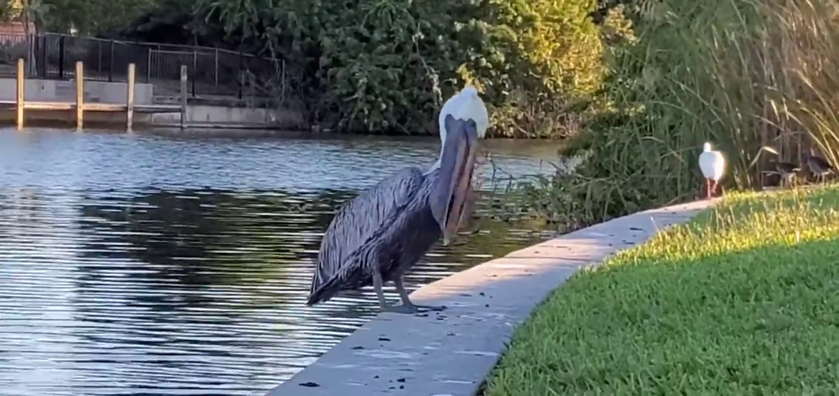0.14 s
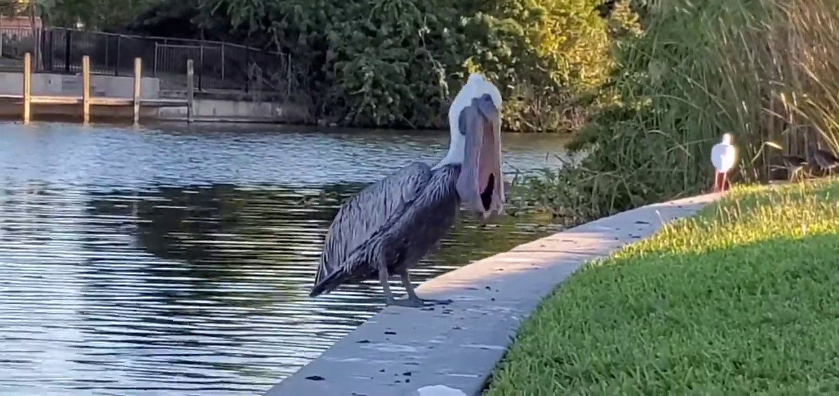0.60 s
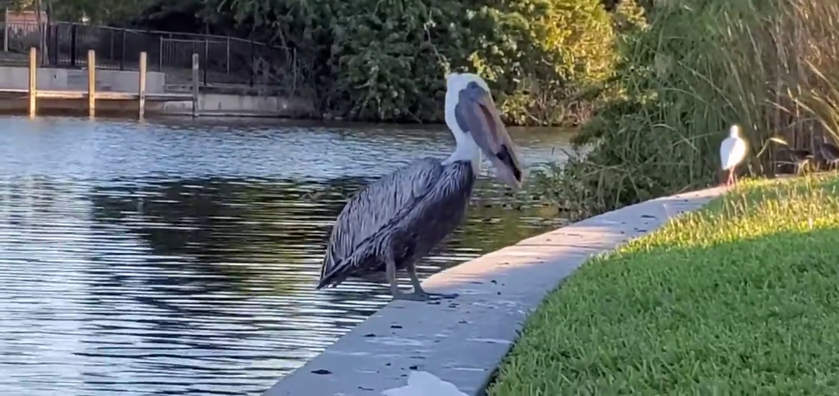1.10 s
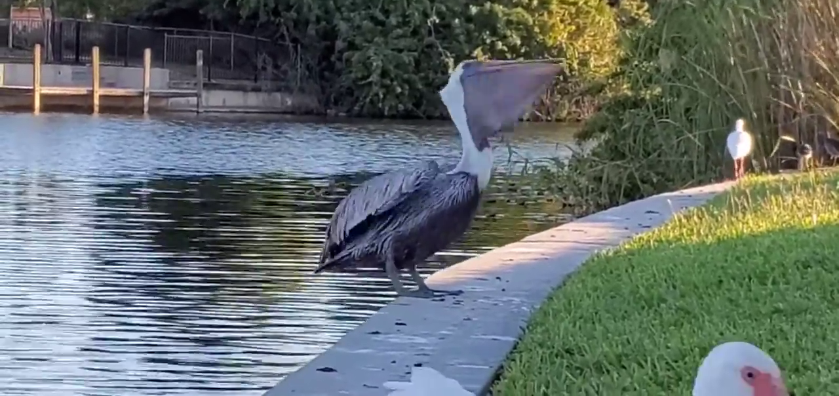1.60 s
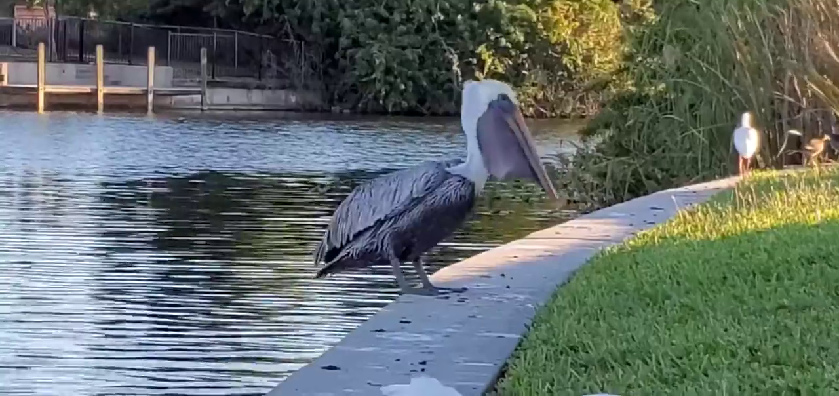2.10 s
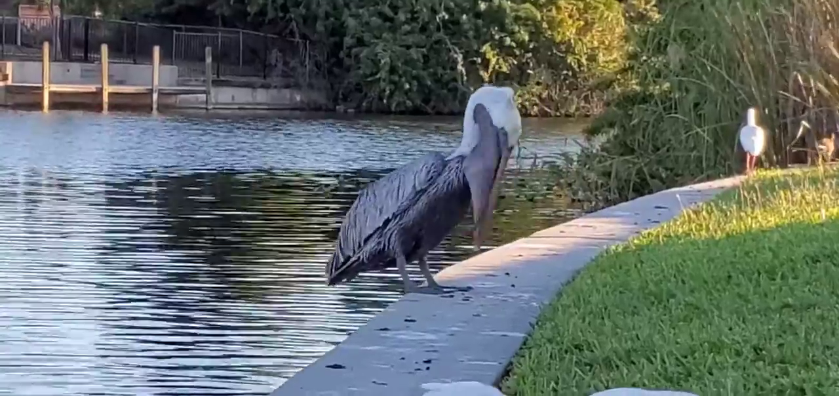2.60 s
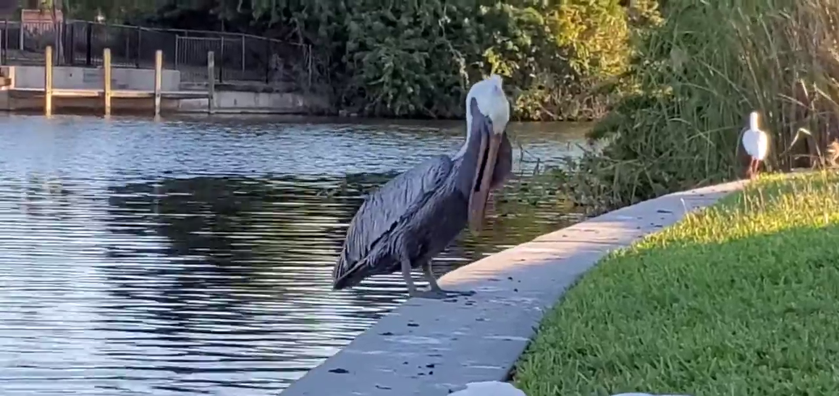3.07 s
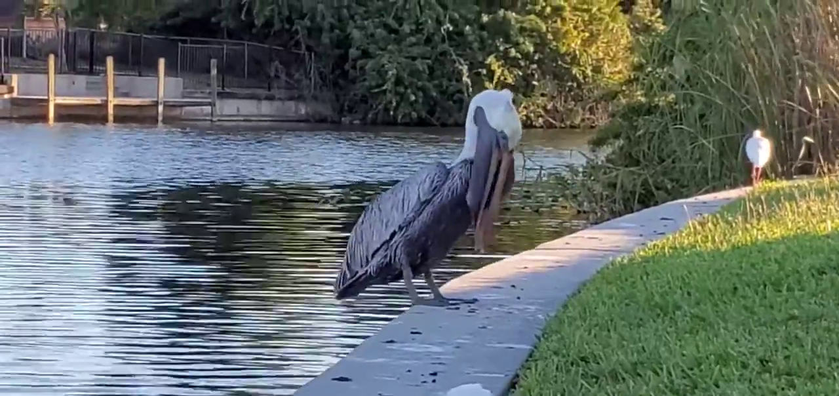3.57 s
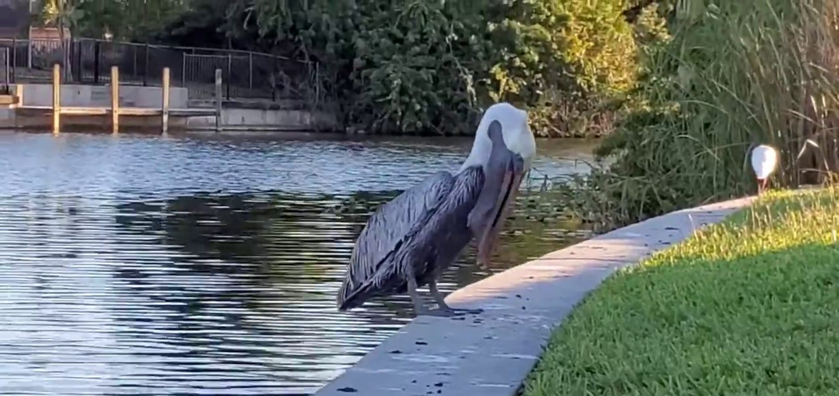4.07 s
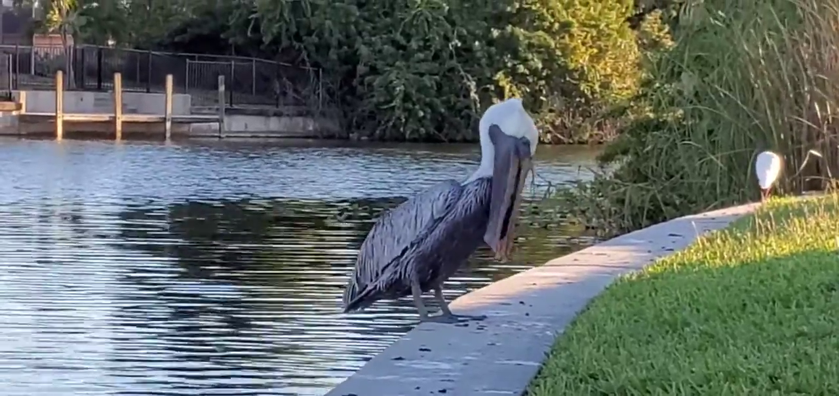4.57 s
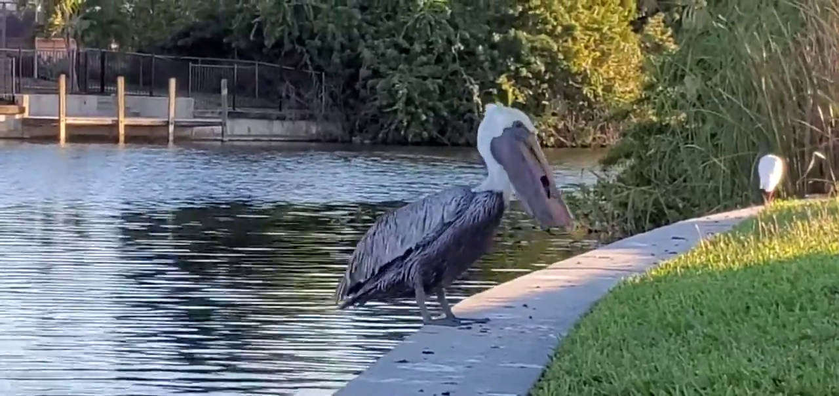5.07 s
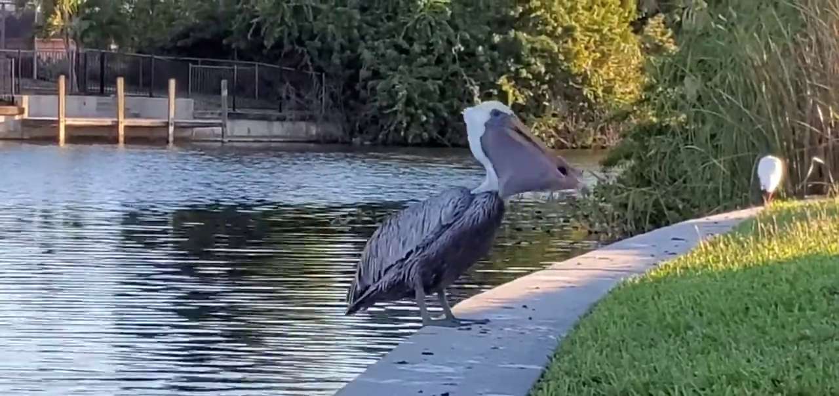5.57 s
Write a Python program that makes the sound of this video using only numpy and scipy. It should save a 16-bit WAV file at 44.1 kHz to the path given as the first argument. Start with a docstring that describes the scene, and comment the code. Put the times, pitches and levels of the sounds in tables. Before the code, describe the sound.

Outdoors by a pond, a steady low machine hum and town rumble lie under soft hiss. Grass rustles and ticks close to the stereo microphones. A water bird croaks into a rising nasal yelp with a squeal at about one second; a falling whistle breaks into a rasp after two, then a hollow thing is tapped and bounces. Later come a faint cheep and two weaker yelps.

```python
"""A distant machine hums over the rumble of a town while grass rustles and ticks close to two spaced microphones.
Beside a pond, water birds call: rising nasal yelps that open with a croak, a squeal, a falling whistle with a
thin hissy onset that breaks into a rasp, and one faint far cheep; between them a hollow thing is tapped and bounces.
Calls are overtones and breath noise shaped by throats; hum and knocks are built on sines; the rest is shaped noise."""
import sys
import numpy as np
from scipy import signal
from scipy.fft import rfft, irfft, next_fast_len
from scipy.io import wavfile
from scipy.ndimage import uniform_filter1d, map_coordinates

SR = 44100
rng = np.random.default_rng(int(sys.argv[2]) if len(sys.argv) > 2 else 0)


def convert_level_to_amplitude(level_db):
    """Map a level in decibels to its linear amplitude factor."""
    exponent = np.asarray(level_db, float) / 20
    return 10 ** exponent


def persist_wave(psi):
    """Save psi, clipped to +-1, as 16-bit WAV."""
    counts = np.round(np.clip(psi, -1, 1) * 32767).astype(np.int16)
    wavfile.write(sys.argv[1], SR, np.atleast_2d(counts).T)


N = 250488  # length in samples
ONSET_DB = -17  # where a croak or thin note starts, relative to its full level


def unit(x):
    """Scaled to rms 1."""
    return x / np.sqrt(np.mean(x ** 2) + 1e-20)


def along(points, hz):
    """Each column after the Hz, read on a log axis."""
    f, *cols = np.transpose(points)
    return np.squeeze([np.interp(np.log(hz + 1), np.log(f + 1), c) for c in cols])


def curves(rows, t):
    """Each column after the time, read at times t."""
    s, *cols = np.transpose(rows)
    return [np.interp(t, s, c) for c in cols]


def wobble(rate, size=N):
    """A smooth random curve, rate knots a second."""
    knots = rng.standard_normal(int(size * rate / SR) + 4)
    return map_coordinates(knots, [np.arange(size) * rate / SR])


def filtered(x, response):
    """x times a complex response of frequency."""
    m = next_fast_len(x.shape[-1] + 8192)
    spectrum = rfft(x, m) * response(np.fft.rfftfreq(m, 1 / SR))
    return irfft(spectrum, m)[..., :x.shape[-1]]


def sides(lean_db, lead=0):
    """Left and right gains for a level gap in dB and a phase lead of the left in radians."""
    half = convert_level_to_amplitude(lean_db / 2) * np.exp(.5j * lead)
    return np.array([half, 1 / half])


def rush(spectrum, patchy_db):
    """Stereo noise of rms 1 with patches of random gain; its likeness at the two microphones varies with pitch."""
    # Each row: frequency in Hz, left-right likeness 0-1.
    alike = [(30, 0.15), (60, 0.59), (150, 1), (400, 0.66), (800, 0.47), (1500, 0.1), (3000, 0.013)]
    # Each row: frequency in Hz, left over right in dB.
    lean = [(60, -0.5), (180, -1), (550, -0.5), (1650, -1), (4970, 0), (15000, -4.5)]
    z = signal.stft(rng.standard_normal((2, N)), nperseg=512)[2]
    field = uniform_filter1d(rng.standard_normal(z.shape[1:]), size=6, axis=0)
    field = uniform_filter1d(field, size=8, axis=1)
    pair = signal.istft(z * convert_level_to_amplitude(patchy_db * unit(field)), nperseg=512)[1][:, :N]

    def mid_and_side(hz):
        turn = np.arccos(np.clip(along(alike, hz), -1, 1)) / 2
        return convert_level_to_amplitude(along(spectrum, hz)) * [np.cos(turn), np.sin(turn)]

    mid, side = filtered(pair, mid_and_side)
    stereo = np.array([mid + side, mid - side])
    return unit(filtered(stereo, lambda hz: sides(along(lean, hz))))


def hum():
    """Machine tones drift in phase and strength over the distance, a little differently at each microphone."""
    # Steady tones of the machine. Each row: frequency in Hz, level in dB, random drift in knots per second.
    tones = [(59.94, -41.5, 4.005), (122.4, -55, 7.2), (465.6, -79, 3.1), (748, -78, 4.04)]
    # One tone swells now and then. Each row: time of the crest in seconds, level in dB.
    swells = [(.4, -65), (1.42, -65.5), (3.75, -61), (5.68, -61)]
    base_db, swell_s = -68.5, 0.3
    t = np.arange(N) / SR

    def tone(hz, rate):
        shared = 0.81 * wobble(rate)
        apart = 0.33 * np.outer([1, -1], wobble(rate))
        return np.sqrt(2) * np.sin(2 * np.pi * hz * t + shared + apart)

    swell_db = base_db + sum((db - base_db) * np.exp(-((t - s) / swell_s) ** 2) for s, db in swells)
    whine = convert_level_to_amplitude(swell_db + 3.4 * wobble(7)) * tone(369.4, 3.056)
    steady = sum(convert_level_to_amplitude(db + 4.3 * wobble(rate)) * tone(hz, rate) for hz, db, rate in tones)
    return (whine + steady) * convert_level_to_amplitude([[-.7], [.7]])  # leans right


def surroundings():
    """The low rumble of a town and a soft broad wash with the steady hiss of the microphones at its top."""
    # Shape of the rumble. Each row: frequency in Hz, relative density in dB.
    rumble = [(12, -84), (20, -51), (27, -16), (29, -4), (41, -2.5), (59, 3), (71, -2.5), (86, 1),
              (108, -5), (200, -33.5), (260, -76), (440, -120)]
    # Shape of the wash and hiss. Each row: frequency in Hz, relative density in dB.
    wash = [(94, -23.5), (160, -1.5), (194, -6.5), (340, -11.5), (480, -14.5), (680, -13), (900, -19.5),
            (1250, -20), (2400, -26.5), (4800, -30.5), (6300, -31.5), (7330, -38), (10000, -36.5),
            (15800, -27.5)]
    return convert_level_to_amplitude(-39.5) * rush(rumble, patchy_db=1.5) + convert_level_to_amplitude(-53.5) * rush(wash, patchy_db=1.28)


def grass():
    """A bright rustle: a low bed plus swishes that start fast and fade, broken up by uneven grains."""
    # The bed follows the breeze. Each row: time in seconds, level in dB.
    bed = [(0, -60.5), (2.5, -58.5), (5.68, -71.5)]
    # Swishes through the grass. Each row: start in seconds, level in dB.
    swishes = [(0.01, -54), (.17, -56), (1.12, -49.5), (1.37, -49), (1.55, -49), (1.765, -45.5),
               (1.97, -52), (2.2, -48), (2.33, -56), (2.49, -54), (2.65, -49.5), (3.55, -51.5)]
    # Shape of the rustle. Each row: frequency in Hz, relative density in dB.
    blades = [(3000, -11), (6000, -9.5), (8000, -15), (10000, -11), (12500, -3), (14500, -11.5), (15800, 3)]
    rise_s, t60_s = 0.0057, 1
    t = np.arange(N) / SR
    power = convert_level_to_amplitude(curves(bed, t)[0]) ** 2
    for s, db in swishes:
        age = np.clip(t - s, 0, None)
        power += (convert_level_to_amplitude(db - 60 * age / t60_s) * (1 - np.exp(-age / rise_s))) ** 2
    grains = convert_level_to_amplitude(1.6 * wobble(30) + 2.4 * wobble(150))
    return np.sqrt(power) * grains * rush(blades, patchy_db=1.0)


def ticks():
    """Each snap is a sharp burst of noise through one resonance; many fainter ones fall at random."""
    # Dry ticks close by. Each row: start in seconds, level in dB, centre in Hz, breadth relative to the centre.
    close = [(.0199, -39, 13900, 0.19), (.8106, -46, 11900, 0.29), (.855, -47, 14000, .4),
             (.8935, -36, 4200, 0.53), (1.243, -44.5, 9300, 0.12), (1.381, -45, 10000, .5),
             (1.595, -49, 5000, 1.1), (1.696, -45.5, 2520, 0.2), (1.771, -51, 9300, 0.26),
             (1.928, -52, 7000, 0.33), (1.997, -45, 7000, 0.71), (2.781, -43.5, 12500, 0.45),
             (2.99, -53.5, 6000, 0.41), (3.052, -50, 8500, .9), (3.129, -42, 12000, 1),
             (3.5154, -47, 14000, .4), (3.6516, -52, 14500, .4), (3.773, -48, 11000, 1),
             (3.8262, -64, 4300, 0.35), (4.0547, -55, 14500, .3), (4.2183, -52, 14500, .3),
             (4.3535, -51, 11800, .5), (4.382, -49, 5700, 0.23), (4.9655, -35, 11000, 1.1),
             (5.3597, -48, 12100, 0.4)]
    out, t = np.zeros((2, N + SR)), np.arange(SR // 50) / SR
    when, strength, colour = rng.random((60, 3)).T
    faint = np.transpose([when * N / SR, -60 + 7 * strength, 4000 + 10000 * colour, 0.45 + strength])
    for s, db, hz, breadth in [*close, *faint]:
        noise = rng.standard_normal(len(t)) + .5 * rng.standard_normal((2, len(t)))  # shared + each side
        burst = convert_level_to_amplitude(-60 * t / 0.0073) * noise
        peak = signal.iirpeak(hz, 0.84 / max(breadth, .05), SR)
        snap = signal.lfilter(*peak, signal.lfilter(*peak, burst))  # twice, for steep flanks
        out[:, round(s * SR):][:, :len(t)] += convert_level_to_amplitude(db) * snap / np.abs(snap).max()
    return out[:, :N] * convert_level_to_amplitude([[-1.6], [1.6]])  # leans right


def voice(notes, throat, jitter, breath, tilt_db=0, shimmer_db=2.2, count=24):
    """Overtones of the pitch, lines halfway when every other beat is weak, and rasp, all through the throat."""
    source = np.zeros(N)
    for rows in notes:
        at = np.arange(round(rows[0][0] * SR), min(round(rows[-1][0] * SR), N))
        hz, db, half, rasp = curves(rows, at / SR)
        rasp = np.clip(rasp, 0, 1)
        shaken_hz = hz * (1 + jitter * rasp * wobble(316, size=len(at)))
        phase = np.pi * np.cumsum(shaken_hz) / SR  # runs at half the pitch
        k = np.arange(1, count + 1)[:, None]  # even k: overtones; odd k: the lines halfway
        bright = convert_level_to_amplitude((k - 9.0) * (0.059 * (db + 51.5) + tilt_db))  # more effort, stronger high overtones
        # each overtone fades on its own in moving air
        bright = bright * convert_level_to_amplitude(shimmer_db * np.array([wobble(45.2, size=len(at)) for _ in k]))
        lines = np.where(k % 2, half, 1) * bright * np.cos(k * phase)
        tone = np.sum(lines * (k * hz < 30000), axis=0)  # no line above 15 kHz
        air = breath * rng.standard_normal(len(at)) * (1 + np.cos(phase))  # puffs at half the pitch
        edge = np.clip(np.minimum(at - at[0], at[-1] - at) / (0.0016 * SR), 0, 1)
        level = convert_level_to_amplitude(db + 0.4 * wobble(78.7, size=len(at))) * edge
        source[at] += level * (np.sqrt(1 - 0.56 * rasp) * tone + np.sqrt(rasp) * air)

    def throat_response(hz):
        gain_db, lean_db, lead = along(throat, hz)
        return convert_level_to_amplitude(gain_db) * sides(lean_db, lead)

    return filtered(source, throat_response)


def clear(rows):
    """A pitch and effort curve sung with an almost clean voice: small half-pitch and rasp shares."""
    return [(*row, 0.043, 0.037) for row in rows]


def croak(s, length, hz, db, half):
    """A quick rise into a hoarse, slightly climbing grunt."""
    rise, climb, rasp = 0.31, 0.064, 0.93  # share of the length, share of the pitch, share 0-1
    return [(s, hz * (1 - climb), db + ONSET_DB, half, rasp),
            (s + rise * length, hz, db, half, rasp),
            (s + length, hz * (1 + climb), db, half, rasp)]


def yelps():
    """Hoarse croaks open into clear, rising yelps through the same nasal throat."""
    # Croaks. Each row: start in seconds, length in seconds, pitch in Hz, effort in dB, half-pitch share 0-1.
    croaks = [(1.117, 0.018, 1806, -51.5, 0.2), (4.496, 0.0266, 1306, -62.5, 1),
              (5.53, 0.0428, 1290, -64, 0.93)]
    # One list per yelp. Each row: time in seconds, pitch in Hz, effort in dB.
    calls = [
        [(1.134, 1117, -49.5), (1.15, 1168, -46), (1.16, 1263, -52), (1.206, 1233, -53.5), (1.234, 1373, -53)],
        [(4.522, 994, -59), (4.558, 1110, -60), (4.612, 1200, -56.5), (4.663, 1320, -57.5)],
        [(5.565, 912, -63), (5.577, 950, -64), (5.591, 1085, -58), (5.68, 1290, -60)],
    ]
    # Throat and microphones together. Each row: frequency in Hz, gain in dB, left over right in dB,
    # lead of the left in radians.
    throat = [(600, -26, 0, .4), (950, -8, 22, 2.7), (1130, -6, 4, 1.85), (1315, 5, -1, 1.34),
              (1770, 0, -2, 0.51), (2130, 1.5, -1, 2.5), (2394, 3.5, 0.5, 3.9), (2560, -1, 1, 3.6),
              (3450, 3.5, 4.5, 7.5), (3734, 1.5, 1, 7.96), (3920, -7, -2, 8.3), (4416, -3.5, -8, 10.3),
              (4820, 2.5, 0.5, 12.7), (5700, -6, 2, 13.9), (6660, -8.5, 13, 14.1), (7500, -19, 6, 15.5),
              (9900, -18.5, 12, 21), (11100, -9, -13, 25.3), (14000, -39, -6, 54)]
    hoarse = voice([croak(*row) for row in croaks], throat, jitter=0.05, breath=2.4, tilt_db=-.5)
    rising = voice([clear(rows) for rows in calls], throat, jitter=0.052, breath=1.5, tilt_db=-0.25,
                   shimmer_db=2.0)
    return hoarse + rising


def held(s, length, hz, db):
    """A note that scoops up to its pitch, then fades."""
    rise_s, scoop, fade_db = 0.02, 0.015, 6  # scoop as a share of the pitch
    return clear([(s, hz * (1 - scoop), db - fade_db), (s + rise_s, hz, db),
                  (s + length / 2, hz, db), (s + length, hz, db - fade_db)])


def squeal():
    """One held, nearly clean note through its own throat."""
    # Held notes. Each row: start in seconds, length in seconds, pitch in Hz, effort in dB.
    notes = [(1.245, .08, 2165, -54.5)]
    # Throat and microphones. Each row: frequency in Hz, gain in dB, left over right in dB,
    # lead of the left in radians.
    throat = [(2090, 5, -1, 1.9), (4330, -6, -7, 11.3), (6500, -3, 8, 14), (8700, -18, 14, 19),
              (10800, -34, 0, 25)]
    return voice([held(*row) for row in notes], throat, jitter=0.11, breath=1.0, tilt_db=-0.08)


def thin_note(s, length, hz, db):
    """A short note of unsteady pitch that rises fast, then climbs as it fades."""
    rise_s, climb, fade_db, rasp = 0.0062, 0.036, 6, 0.98  # climb as a share of the pitch, rasp share 0-1
    return [(s, hz, db + ONSET_DB, 0, rasp), (s + rise_s, hz, db, 0, rasp),
            (s + length, hz * (1 + climb), db - fade_db, 0, rasp)]


def hissy_onset_and_cheep():
    """A thin hissy onset of the whistle near 5 kHz and one faint far cheep: shaken tones without overtones."""
    # First the onset, then the cheep. Each row: start in seconds, length in seconds, starting pitch in Hz,
    # effort in dB.
    notes = [(2.229, .04, 5000, -53), (4.371, .07, 2190, -71)]
    # Colour and bearing at the microphones. Each row: frequency in Hz, gain in dB, left over right in dB,
    # lead of the left in radians.
    throat = [(2150, 1, -1.5, -0.73), (5000, 0, .5, 1.2)]
    return voice([thin_note(*row) for row in notes], throat, jitter=0.03, breath=0, count=2)


def whistle():
    """A falling, almost clean call with weak upper overtones."""
    # The call. Each row: time in seconds, pitch in Hz, effort in dB.
    fall = [(2.245, 1790, -53), (2.295, 1768, -40), (2.33, 1700, -47.5), (2.363, 1642, -55),
            (2.41, 1607, -54), (2.502, 1592, -50), (2.514, 1570, -61)]
    # Throat and microphones. Each row: frequency in Hz, gain in dB, left over right in dB,
    # lead of the left in radians.
    throat = [(1700, -30, -9, 3.5), (2720, -29, 2, 2.8), (3124, 5.5, 7, 4.06), (3420, -2, 3.5, 4.05),
              (4030, -16, 1, 2.6), (4900, -17, -14, 8.2), (5300, -28, -3, 8), (6500, -32, 5, 11),
              (8700, -24, -13, 12.5), (9500, -50, -4, 14)]
    return voice([clear(fall)], throat, jitter=.06, breath=1.3, tilt_db=-1.5, shimmer_db=2.5)


def rasp_end():
    """The broken end of the whistle drops a register and fills with half-pitch lines and breath."""
    # The break. Each row: time in seconds, pitch in Hz, effort in dB, half-pitch share 0-1, rasp share 0-1.
    broken = [(2.5, 1570, -62, .8, 0.1), (2.535, 1555, -54, .85, 0.13), (2.57, 1553, -55, .9, 0.55),
              (2.576, 1282, -57, 0.91, 0.75), (2.615, 1272, -60, 1, 0.62), (2.635, 1270, -68, 1, .5)]
    # Throat and microphones. Each row: frequency in Hz, gain in dB, left over right in dB,
    # lead of the left in radians.
    throat = [(2397, -28, 0, 3.4), (3180, 8.5, -1, 3.96), (3500, -5, 4, 4.6), (3900, 2, 1, 4.5),
              (4200, 7.5, 1, 7.2), (4470, -0.5, -5, 7.4), (5000, -12, 0, 7.6), (5530, -8, 1, 7.7),
              (6140, -8, 10, 9.8), (7000, -19, -1, 11)]
    return voice([broken], throat, jitter=0.025, breath=1.2, tilt_db=.4, shimmer_db=4)


def dull_echo(x, delay_s, db, top_hz):
    """One late copy without its treble."""
    return filtered(x, lambda hz: convert_level_to_amplitude(db) * np.exp(-2j * np.pi * hz * delay_s) / (1 + (hz / top_hz) ** 6))


def bank_echo(x):
    """Banks and trees answer after a gap with a diffuse tail; each frequency dies at its own speed."""
    # Decay of the echo. Each row: frequency in Hz, time to fall 60 dB in seconds.
    decay = [(500, 0.33), (2500, 0.53), (8000, 0.044)]
    hz, t, z = signal.stft(rng.standard_normal((2, SR // 3)), SR, nperseg=256)
    tail = signal.istft(z * convert_level_to_amplitude(-60 * t / along(decay, hz)[:, None]), SR, nperseg=256)[1]
    tail = np.pad(tail / np.linalg.norm(tail[0]), ((0, 0), (round(.03 * SR), 0)))
    return signal.fftconvolve(x, tail, axes=1)[:, :N]


def birds():
    """Callers at different bearings; a near wall and a far bank send dull echoes, banks and trees a diffuse one."""
    yelping, squealing, whistling = yelps(), squeal(), whistle()
    near = yelping + squealing + whistling + rasp_end()
    wall_yelps = dull_echo(yelping[1], delay_s=.048, db=-12, top_hz=2580)
    wall_whistle = dull_echo(whistling, delay_s=.048, db=-14, top_hz=3600)
    far_bank = dull_echo(squealing[1], delay_s=.11, db=-4, top_hz=2500)  # loses the overtones
    echoes = wall_yelps + wall_whistle + far_bank + convert_level_to_amplitude(-14.0) * bank_echo(near)
    return near + echoes + hissy_onset_and_cheep()


def knocks():
    """A contact rings the hollow thing's modes; a harder one pushes more and reaches the upper modes."""
    # A hollow thing is tapped and bounces. Each row: start in seconds, relative level in dB, hardness 0-1.
    taps = [(2.6506, -37, 0.36), (2.6702, -31.5, 0.99), (2.6811, -39, 0.35)]
    # Its modes. Each row: frequency in Hz, relative level in dB, time to fall 60 dB in seconds.
    modes = [(524, -2, 0.04), (1200, -11, 0.035), (1743, -0.5, 0.038), (2750, -5, 0.021), (3250, -11, .02),
             (4200, -16, .015), (5640, -19, 0.025)]
    push_s = .0001  # width of the pressure push
    out, t = np.zeros(N + SR), np.arange(SR // 8) / SR
    for s, db, hard in taps:
        ring = sum(convert_level_to_amplitude(level - 60 * t / t60) * np.abs(hard) ** (hz / 3000) * np.sin(2 * np.pi * hz * t)
                   for hz, level, t60 in modes)
        push = 4 * hard * np.exp(-((t - 2 * push_s) / push_s) ** 2)
        noise = 0.87 * hard * convert_level_to_amplitude(-60 * t / 0.0046) * rng.standard_normal(len(t))
        out[round(s * SR):][:len(t)] += convert_level_to_amplitude(db - 8.5) * (ring * (1 - np.exp(-t / 0.001)) + push + noise)
    lean = [(500, -.3), (2700, -6.5)]  # Hz, left over right in dB
    return filtered(out[:N], lambda hz: sides(along(lean, hz)))


def scene():
    """Everything heard at the two microphones."""
    return hum() + surroundings() + grass() + ticks() + birds() + knocks()


def roll_off(x):
    """The treble ends steeply here."""
    return signal.sosfilt(signal.butter(12, 16640, fs=SR, output="sos"), x)


def record(dry):
    """The recorder keeps nothing above its band limit of 15830 Hz."""
    mix = filtered(dry, lambda hz: hz < 15830)
    return roll_off(mix)


dry = scene()
out = record(dry)
persist_wave(out)
```